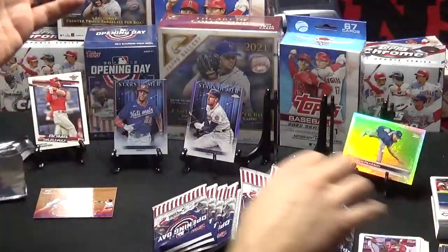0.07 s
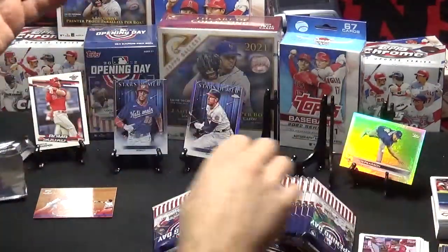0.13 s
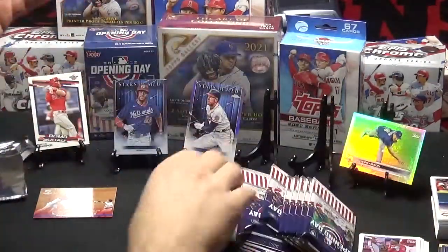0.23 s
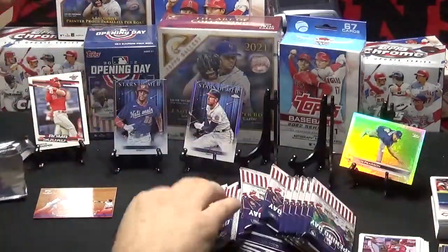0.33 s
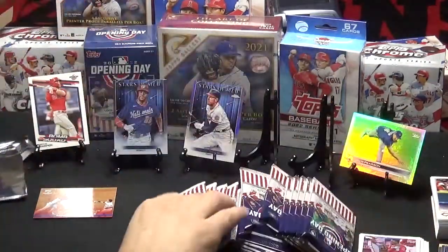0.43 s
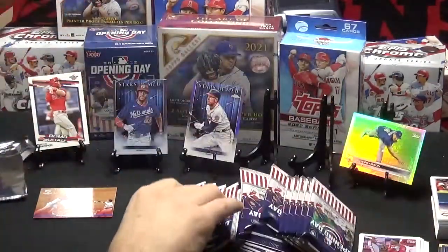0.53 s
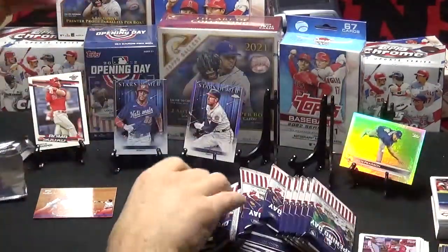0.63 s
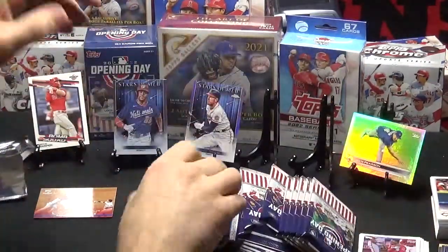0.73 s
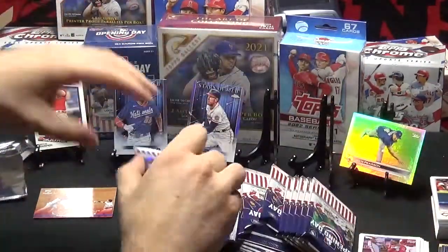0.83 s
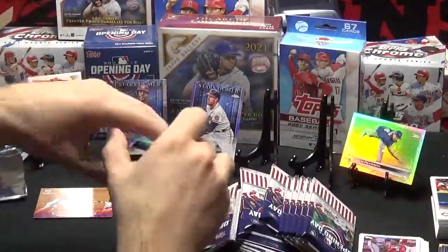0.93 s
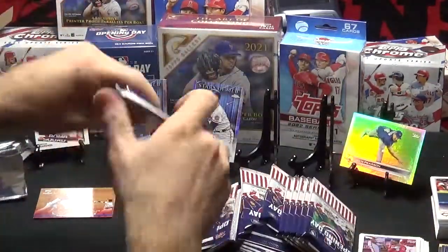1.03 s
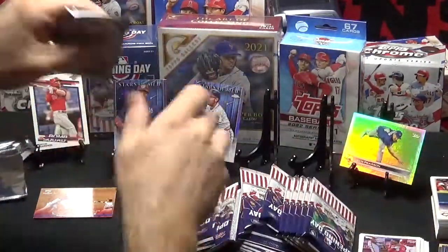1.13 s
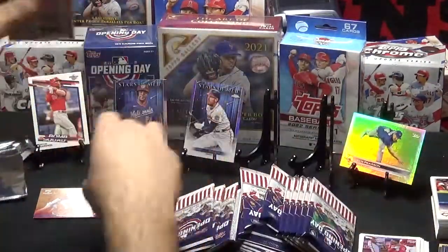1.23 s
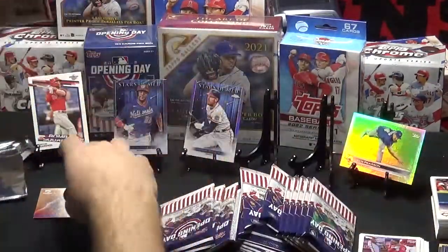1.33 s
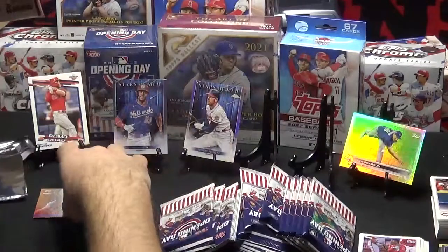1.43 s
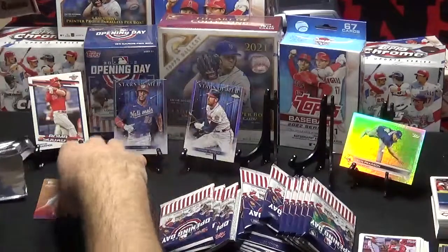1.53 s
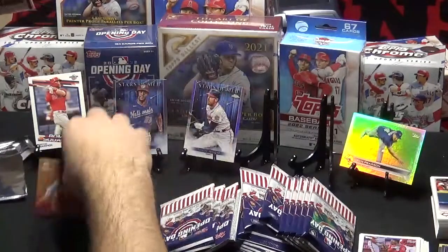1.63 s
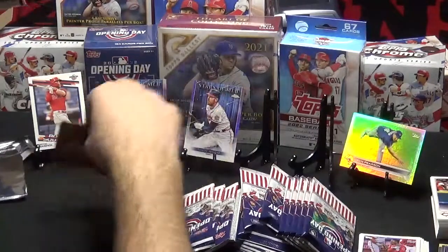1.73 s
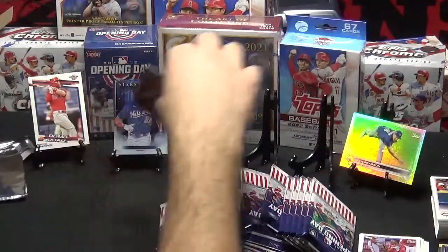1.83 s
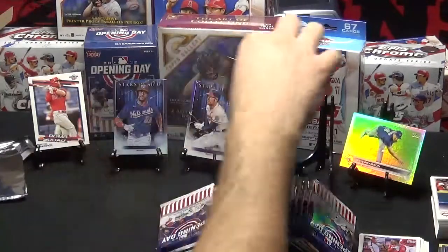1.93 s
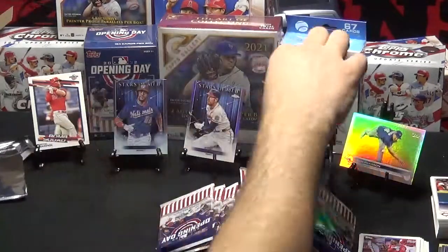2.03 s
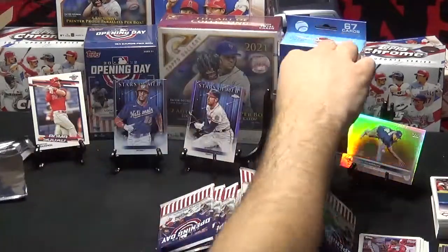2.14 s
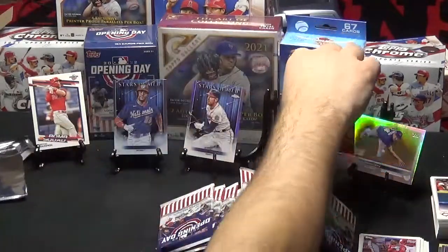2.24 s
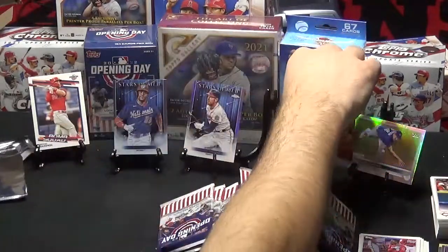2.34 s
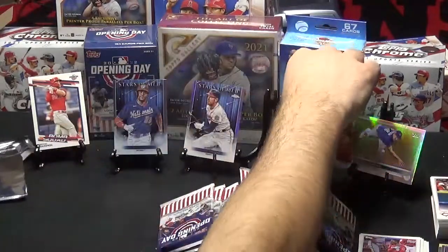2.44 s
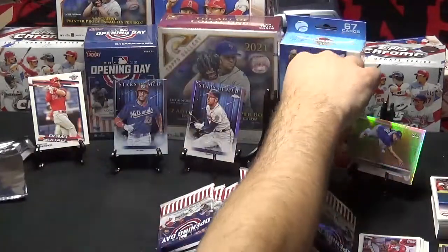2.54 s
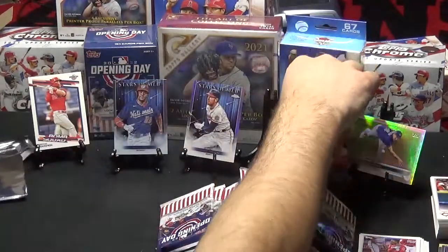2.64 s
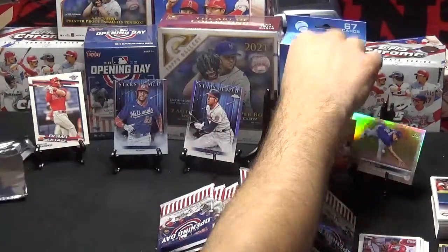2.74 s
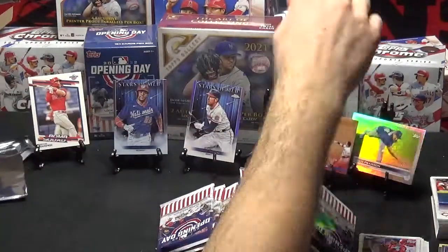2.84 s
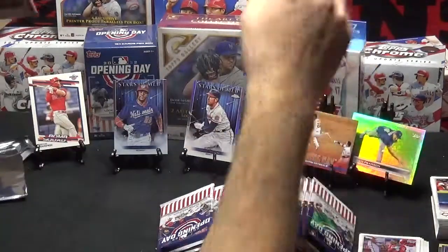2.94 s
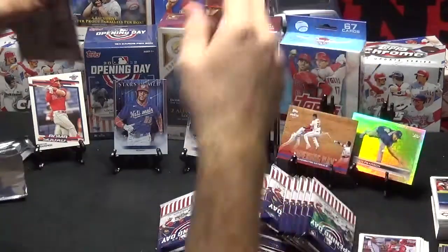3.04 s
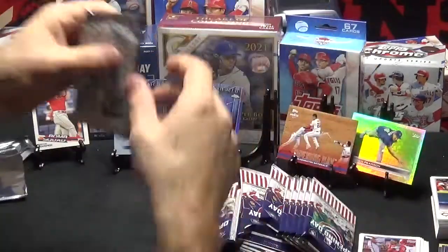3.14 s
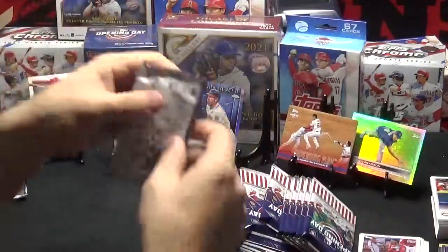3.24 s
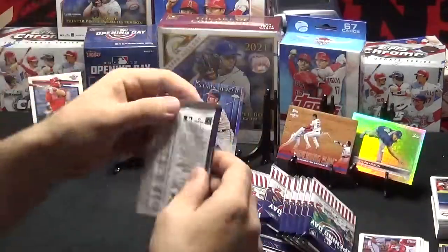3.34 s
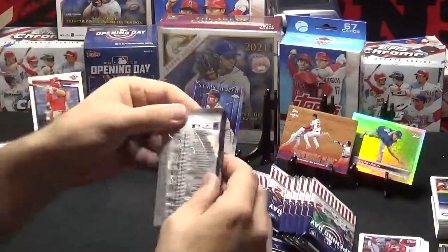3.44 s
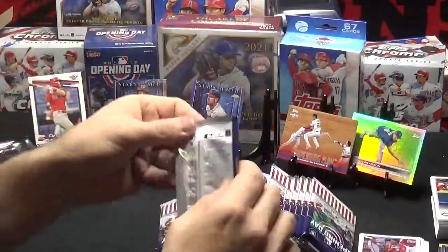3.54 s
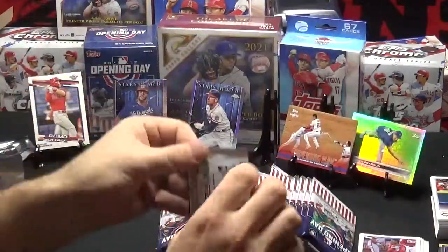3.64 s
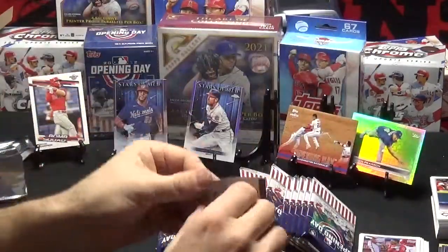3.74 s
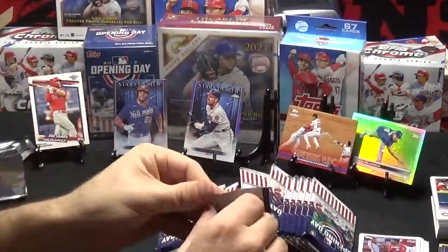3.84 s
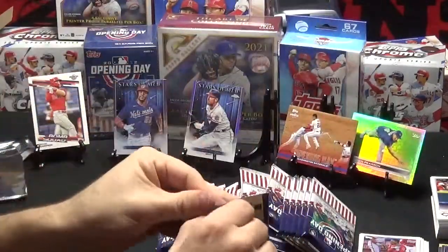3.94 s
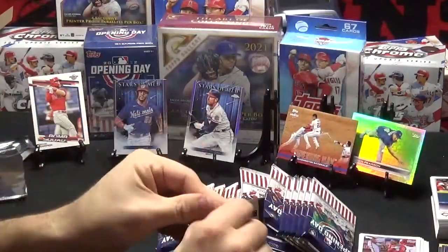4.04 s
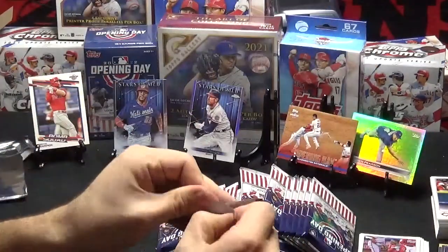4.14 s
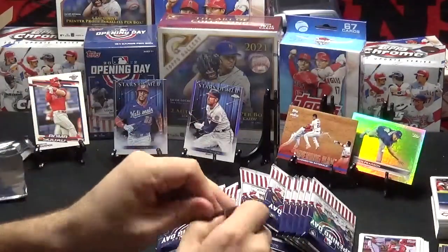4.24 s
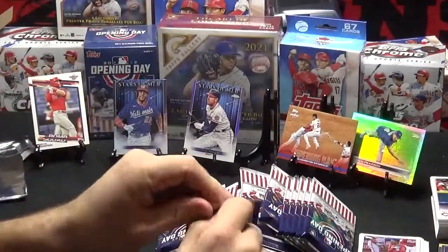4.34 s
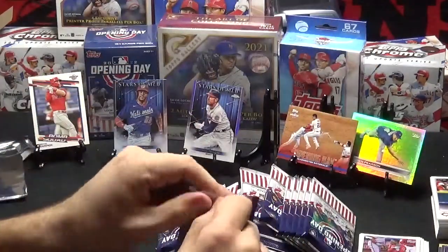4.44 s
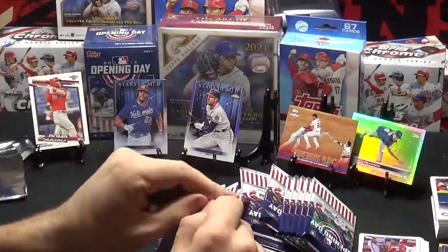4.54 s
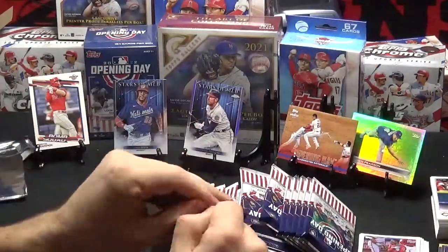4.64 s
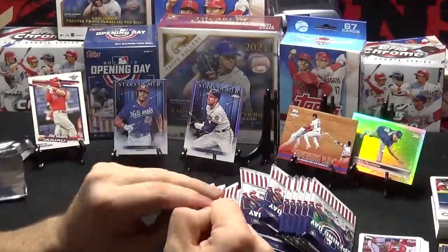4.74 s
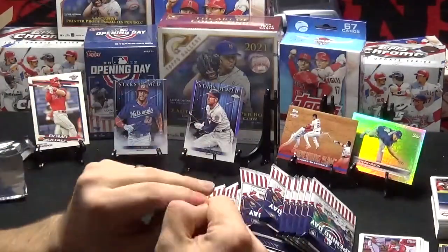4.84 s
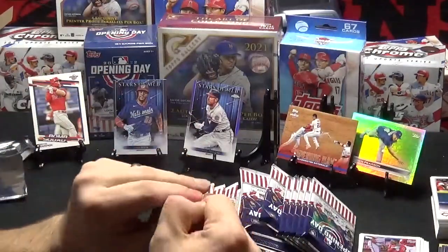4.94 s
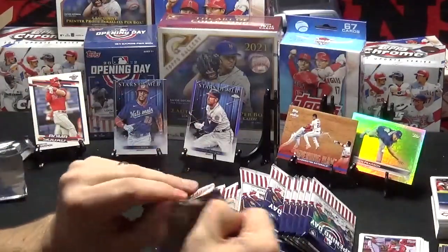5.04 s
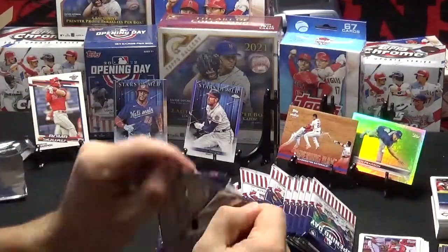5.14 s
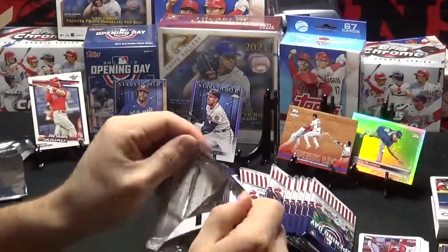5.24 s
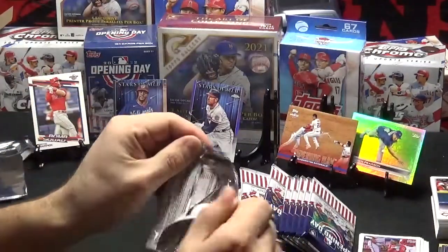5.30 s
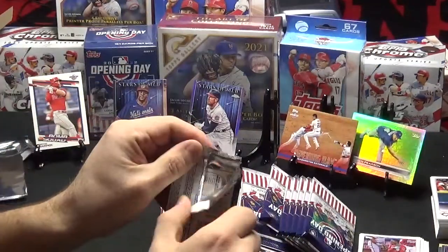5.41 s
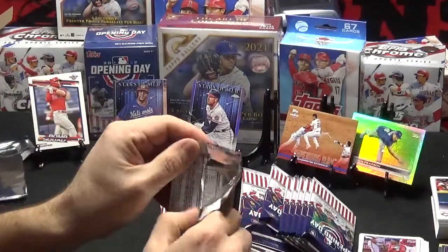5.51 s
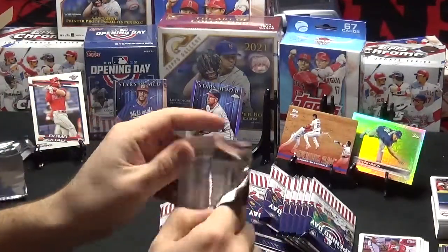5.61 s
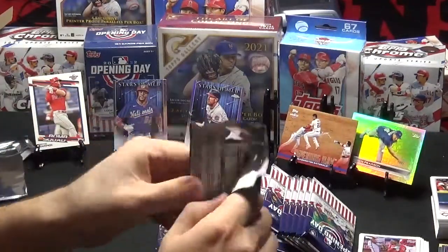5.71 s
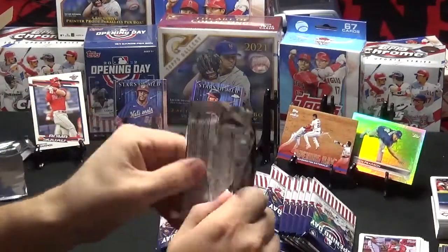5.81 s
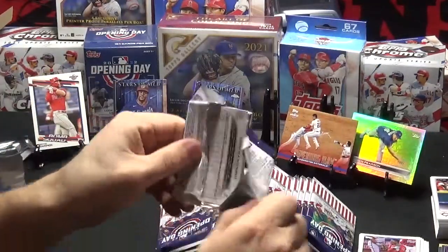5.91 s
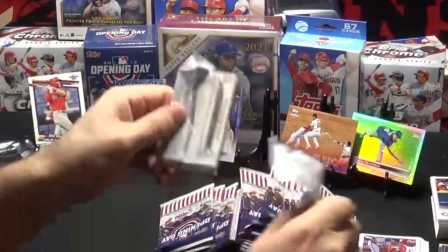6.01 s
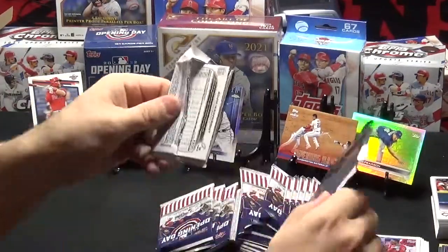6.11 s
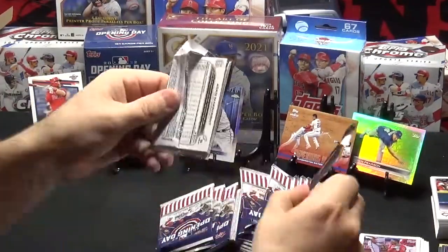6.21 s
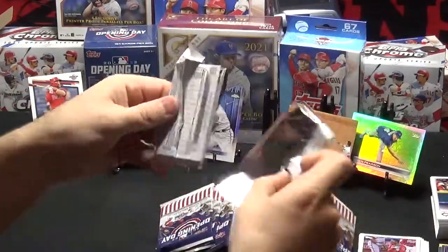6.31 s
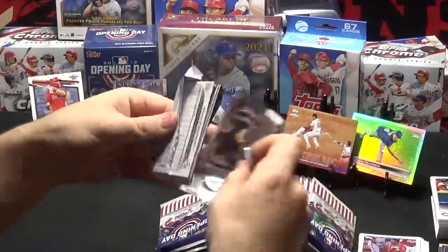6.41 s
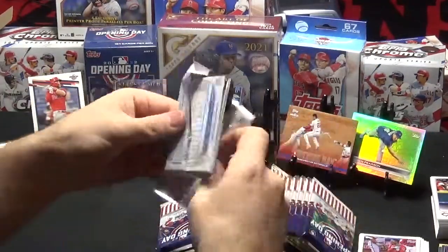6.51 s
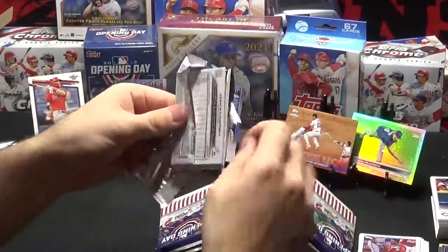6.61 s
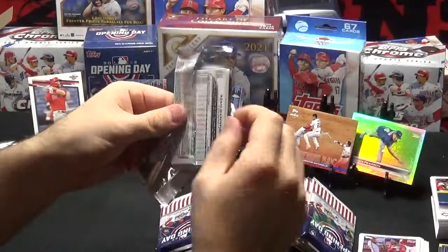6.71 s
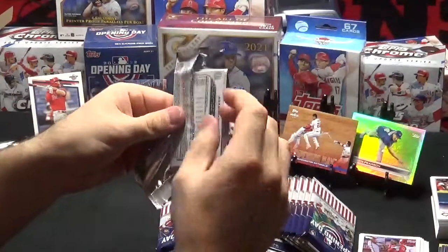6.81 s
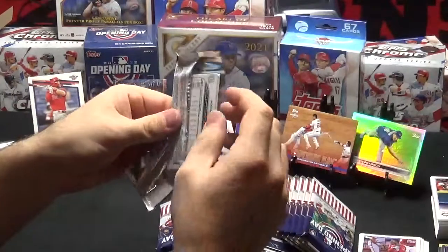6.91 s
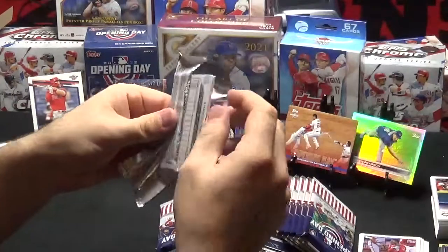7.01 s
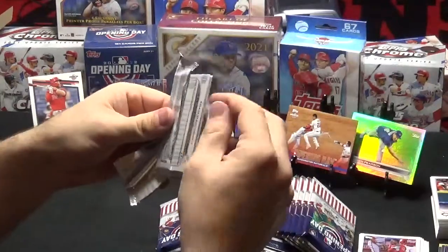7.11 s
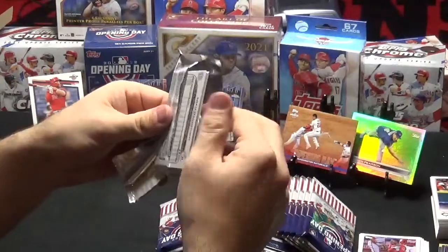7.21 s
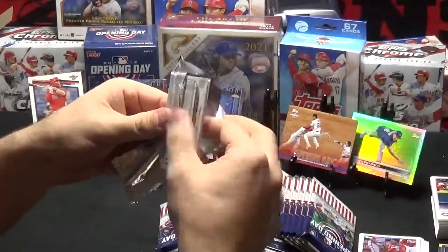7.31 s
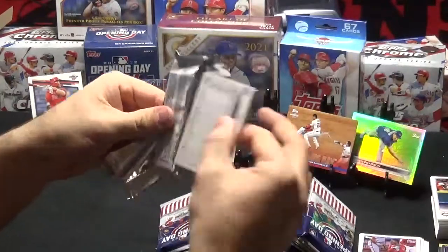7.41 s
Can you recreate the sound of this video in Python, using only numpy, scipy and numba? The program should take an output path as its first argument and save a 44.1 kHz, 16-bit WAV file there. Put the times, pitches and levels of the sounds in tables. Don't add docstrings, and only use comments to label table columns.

```python
import sys
import numpy as np
from scipy import signal
from scipy.fft import rfft, irfft
from scipy.io import wavfile
from scipy.ndimage import uniform_filter1d
from numba import njit

SR = 44100
rng = np.random.default_rng(int(sys.argv[2]) if len(sys.argv) > 2 else 0)


def invert_db(level):
    return 10 ** (np.asarray(level, dtype=float) / 20)


def generate_wav(sig):
    pcm = np.round(np.clip(np.atleast_2d(sig).T, -1, 1) * 32767).astype(np.int16)
    wavfile.write(sys.argv[1], SR, pcm)


N = 328986


def column(table, t):
    s, *rest = np.transpose(table)
    return [np.interp(t, s, c) for c in rest]


def shape(table, hz):
    f, v = np.transpose(table)
    return np.interp(np.log(np.maximum(hz, 1)), np.log(f), v)


def walk(rate):
    hold = int(SR / rate)
    levels = np.repeat(rng.standard_normal(N // hold + 1), hold)
    return 1.3 * uniform_filter1d(uniform_filter1d(levels, hold), hold)[:N]


def highpass(x, hz, order=3):
    return signal.sosfilt(signal.butter(order, hz, "high", fs=SR, output="sos"), x)


def room(air_db=-7.5):
    # f/Hz, level/dB, wander/dB
    hum_lines = [(29.8, -15, 1.5), (38.6, -30, -10), (87, -17.5, 4), (89.3, -28, 4.5), (119.7, 0.5, 0)]
    # t/s, blade tone minus hum/dB
    blade_load = [(0, -4.5), (.25, -11), (.48, -5), (.91, -11), (2.32, -8), (2.49, -14), (2.76, -6.5),
                  (3.6, -13), (4.24, -7.5), (5.1, -11), (5.67, -7), (5.85, -14), (6.15, -8), (7.46, -7)]
    # f/Hz, density/dB per Hz
    air_spectrum = [(20, -12.5), (55, -17), (95, -3.5), (170, -8.5), (300, -15), (400, -16.5), (800, -20),
                    (2300, -22.5), (6000, -28.5), (11000, -31)]
    # f/Hz, likeness/0-1
    likeness = [(20, 1), (200, 0.83), (400, 0.37), (1200, .0), (2600, 0.06), (6000, 0.7), (11000, .75)]
    # t/s, level/dB, width/s
    ducks = [
        (5.07, -4.5, .1),
        (5.92, -7, .1),
        (7.46, -2.5, .2),
    ]
    blade_hz = 202.4
    t = np.arange(N) / SR
    gain_db = np.minimum(-51 + .17 * t ** 2, -46.5)
    for s, db, width in ducks:
        gain_db = gain_db + db * np.exp(-((t - s) / width) ** 2)

    lines = np.zeros(N)
    for hz, db, wander_db in hum_lines:
        level = invert_db(db + wander_db * walk(4))
        lines += level * np.sin(2 * np.pi * hz * t + 0.31 * wander_db * walk(3.4))
    flutter_db, drift = 2.2 * walk(9), 1.2 * walk(3)
    blade_level = invert_db(column(blade_load, t)[0] + flutter_db)
    lines += blade_level * np.sin(2 * np.pi * blade_hz * t + drift)

    hz = np.fft.rfftfreq(N, 1 / SR)
    alike = np.clip(shape(likeness, hz), 0, 1)
    noise = rfft(rng.standard_normal((2, N))) * invert_db(shape(air_spectrum, hz))
    mid, side = noise * np.sqrt([1 + alike, 1 - alike])
    air = irfft(np.array([mid + side, mid - side]), N)
    air *= invert_db(air_db) / air.std()
    balance = invert_db(np.array([[.1], [-.1]]))
    return (np.sqrt(2) * lines * balance + air) * invert_db(gain_db)


def lens(width_s=0.0025, lower_hz=2583.0):
    # t/s, upper level/dB, lower level/dB, accent on every other step/dB
    spells = [
        (0, -56.5, -67, .6),
        (.85, -67, -63, .6),
        (1.15, -64, -59, .6),
        (1.8, -66, -57, 5),
        (2.49, -66, -67, .6),
        (3.0, -61, -67, .6),
        (5.5, -57, -62, .6),
    ]
    steps_per_s, upper_hz = 30, 3400
    s = np.arange(int(steps_per_s * N / SR)) / steps_per_s
    by_column = np.transpose(spells)
    spell = np.searchsorted(by_column[0], s, "right").clip(1) - 1
    _, upper_db, lower_db, accent_db = by_column[:, spell]
    upper_db = upper_db - accent_db * (-1.) ** np.arange(len(s))
    g = rng.standard_normal((len(s), 4)).T
    t, out = np.arange(-600, 600) / SR, np.zeros(N + SR)
    for k in range(len(s)):
        detune = 1 + .006 * g[3, k]
        upper = (.0143, upper_hz * detune, upper_db[k] + 1.6 * g[0, k], width_s)
        lower = (.018, lower_hz * detune, lower_db[k] + 1.2 * g[1, k], 1.57 * width_s)
        for delay_s, hz, db, width in (upper, lower):
            i = int((s[k] + delay_s) * SR)
            swell = invert_db(db) * np.exp(-(t / width) ** 2)
            out[i:i + len(t)] += swell * np.sin(2 * np.pi * hz * t + .5 * g[2, k])
    return out[600:N + 600]


@njit
def ring(s, hz, cycles, left, right):
    out = np.zeros((2, N))
    for g in range(len(s)):
        p = np.exp((2j * np.pi - 1 / cycles[g]) * hz[g] / SR)
        z = 1. + 0j
        start = int(s[g] * SR)
        for i in range(start, min(N, start + int(6 * cycles[g] * SR / hz[g]))):
            z *= p
            out[0, i] += left[g] * z.imag
            out[1, i] += right[g] * z.imag
    return out


def grains(s, hz, cycles, size, pan_db):
    left, right = size * invert_db(pan_db / 2), size * invert_db(-pan_db / 2)
    hz = np.clip(hz, 150, SR / 3)
    return ring(*[np.ravel(v + 0. * s) for v in (s, hz, cycles, left, right)])


def moves(s):
    # peak t/s, crackle level/dB, swell/s per 20 dB, fade/s per 20 dB,
    # big folds minus crackle/dB
    card_moves = [
        (.41, -49, .008, .2, -4),
        (.48, -48, .1, .12, -8),
        (.54, -50, .1, .1, -10),
        (.61, -45, .12, .05, -13),
        (.85, -57, .4, .3, -17),
        (1.03, -43, .04, .12, 2),
        (1.7, -60, .08, .05, 19),
        (2.59, -66, .03, .12, 14),
        (2.795, -62, .008, .15, 17),
        (3.12, -49, .1, .3, -12),
    ]
    grip_moves = [(3.224, -43, .22, .35, -6), (3.383, -37, .021, .19, -7), (3.626, -35, .07, .09, -19),
                  (3.743, -24.5, .021, .06, -19), (3.85, -42, .1, .2, -23), (3.907, -35, .07, .09, -30),
                  (3.995, -26, .03, .15, -21), (4.094, -20, .07, .17, -28), (4.2, -29, .1, .12, -18),
                  (4.322, -21.5, .015, .16, -26), (4.47, -32, .1, .13, -12), (4.649, -43, .2, .12, -18),
                  (4.78, -31, .05, .08, -25), (4.83, -23.5, .03, .2, -22), (4.95, -26, .25, .03, -19)]
    tear_moves = [
        (5.01, -15.5, .005, .15, -20),
        (5.032, -11.5, .03, .25, -22),
        (5.2, -26, .2, .05, -3),
        (5.31, -38, .021, .06, 2.5),
        (5.374, -27, .03, .085, -11),
        (5.53, -31, .011, .19, -9),
        (5.82, -18, .065, .17, -17),
        (5.91, -15.5, .12, .12, -2),
        (6.005, -16, .2, .07, -7),
    ]
    peel_moves = [(6.252, -27, .003, .06, -14), (6.29, -24, .03, .11, -12), (6.42, -42, .1, .07, -7),
                  (6.52, -23.5, .035, .13, -6), (6.6, -33, .1, .035, -13), (6.736, -24.5, .011, .035, -10),
                  (6.848, -36, .04, .055, -23), (6.943, -29, .021, .08, -12), (7.074, -34, .004, .15, -8),
                  (7.138, -27, .03, .05, -13), (7.25, -38, .1, .12, -13), (7.39, -31, .09, .3, -8)]
    rows = np.vstack([card_moves, grip_moves, tear_moves, peel_moves])
    at_s, db, swell_s, fade_s, big_db = rows.T[:, :, None]
    t = np.arange(0, N, 44) / SR

    def level(top_db, fade):
        fall_db = 20 * np.maximum((at_s - t) / swell_s, (t - at_s) / fade)
        return 10 * np.log10(np.sum(invert_db(top_db - fall_db) ** 2, axis=0) + 1e-12)

    return np.interp(s, t, level(db, fade_s)), np.interp(s, t, level(db + big_db, 1.3 * fade_s))


def crackle(per_s=11000, tail_db=2.5, patchy_db=2.0, cycles=1.06, level_db=-11.4, knee_hz=1790.0):
    # f/Hz, density/dB per Hz
    sheet_colour = [(180, -40), (300, 6), (591, -12.5), (719, -5), (915, -11.5), (1530, -7.5), (2230, -3),
                    (9180, 2.5), (11000, 1.5), (14300, -34), (22000, -120)]
    # t/s, top end level/dB
    tautness = [(3.8, -6), (3.92, 8), (4.1, -1.5), (4.79, -3), (4.92, 4), (5.03, 5), (5.09, -6),
                (5.33, -5.5), (5.55, 1.5), (5.72, -6), (5.91, 2.5), (6.1, -10), (6.7, -7), (6.96, .6),
                (7.09, -7.5), (7.15, 3), (7.3, -8), (7.46, -2)]
    count = int(per_s * N / SR)
    u, g = rng.random((count, 3)).T, rng.standard_normal((count, 2)).T
    s, hz = u[0] * N / SR, 300 * (11500 / 300) ** np.sqrt(u[1])
    db, big_db = moves(s)
    taut_db = 0.97 * column(tautness, s)[0] * np.clip(np.log2(hz / 3500), -.5, 1.5)
    colour_db = shape(sheet_colour, hz) + 20 * np.log10(hz / 4000) + taut_db
    clump_db = patchy_db * walk(120)[(u[0] * N).astype(int)]
    rare_db = -tail_db * np.log(u[2] + .01)
    size = np.sign(g[0]) * invert_db(db + level_db + colour_db + clump_db + rare_db)
    big = hz < knee_hz
    fine = grains(s, hz, cycles, size * ~big, 3.1 * g[1])
    soft_size = (size * invert_db(big_db - db + 11.5))[big]
    soft = grains(s[big], hz[big], 1.2, soft_size, 4.9 * g[1, big])
    return highpass(fine, 1080.0) + soft


def small_snaps():
    per_s = 110
    u = rng.random((int(per_s * N / SR), 4)).T
    s = u[0] * N / SR
    db = moves(s)[0] - 2 - 2.5 * np.log(u[1] + .03)
    return np.transpose([s, db, 2900 * 2.8 ** u[2], -4 - 18 * u[3]])


def snaps(count=16, level_db=-15.0, thud_db=-4.0):
    # t/s, peak level/dB, centre
    # # f/Hz, top end minus peak/dB
    single_snaps = [(.413, -43, 1630, -8), (.4868, -42, 1680, 0.5), (.58, -39, 3300, -10),
                    (1.0071, -32, 3810, -16), (1.0108, -18.5, 5100, -10), (1.0225, -17, 3830, -3),
                    (1.038, -26, 3330, -21), (1.6679, -33, 2600, -13), (1.6944, -33, 3200, -12),
                    (2.58, -43, 4300, -22), (2.593, -43, 4200, -22), (1.713, -40, 1800, -12),
                    (1.026, -22, 3500, -10), (1.0135, -23, 3900, -10), (2.6559, -40, 1470, -23),
                    (2.7926, -34, 1330, -16),
                    (3.212, -28.5, 7360, -8), (3.219, -26.5, 4840, -4), (3.3762, -16.5, 5470, -9),
                  (3.41, -17, 7050, -14), (3.464, -21, 4350, -14), (3.4676, -24, 3220, -7),
                  (3.595, -31, 3030, -5), (3.6145, -14.5, 5900, -9), (3.623, -20, 6660, -10),
                  (3.637, -18, 6000, -8), (3.6534, -14.5, 6400, -9), (3.6709, -13, 5000, -14),
                  (3.7318, -24, 3000, -10), (3.7352, -15, 4300, -11), (3.7466, -12, 6000, -4),
                  (3.7629, -11.5, 4540, -25), (3.8256, -22, 6370, -10), (3.9017, -30, 4650, 4),
                  (3.9778, -19, 4650, 7), (3.9866, -17, 6500, 2), (4.0059, -10, 6600, -6),
                  (4.0636, -15, 4520, -14), (4.082, -12, 6700, -3), (4.0913, -6, 6240, -9),
                  (4.1042, -9, 5300, -3),
                    (4.1976, -14, 7700, -2.5), (4.235, -18, 3930, -12), (4.248, -21, 7300, -3),
                   (4.313, -16, 5500, -9), (4.3246, -8, 4600, -6.5), (4.3656, -20, 4480, -7),
                   (4.4013, -11, 4540, -12), (4.458, -21, 7490, 3), (4.4705, -12.5, 4000, -5),
                   (4.595, -15.5, 5900, -13.5), (4.6382, -14.5, 6100, -13), (4.6595, -18, 5050, -13),
                   (4.683, -23.5, 6290, -3), (4.7162, -22, 2270, -17), (4.7507, -23, 5000, -2),
                   (4.7618, -15, 4600, -10), (4.7771, -9, 2200, -13), (4.8251, -7.5, 4540, -9),
                   (4.903, -16, 5600, -12),
                    (5.0057, -18, 5730, 6), (5.078, -4, 4260, -25), (5.0983, -5, 7500, -16),
                  (5.1128, -7, 1770, -33), (5.154, -11, 7490, 1.5), (5.172, -12, 7060, -10),
                  (5.2125, -17, 4700, -2), (5.314, -21.5, 3980, -15), (5.3621, -11, 3830, -11),
                  (5.379, -15, 4400, -14), (5.4242, -22, 4900, -4), (5.5793, -14.5, 5460, -8),
                  (5.6038, -16, 4940, -6), (5.6327, -18, 4400, -18), (5.7097, -16, 3620, -32),
                  (5.731, -14, 7200, -11), (5.7392, -18.5, 2800, -6), (5.7925, -7, 5900, -8),
                  (5.8116, -6.5, 6200, -15), (5.832, -1.5, 5400, -17), (5.8382, -9, 5000, -5),
                  (5.8573, -4.5, 6460, -22), (5.8822, -5.5, 5500, -12), (5.9238, -7, 4130, -13),
                  (5.9473, -9.5, 2800, -17), (6.0056, -4, 7940, -9.5),
                    (6.2918, -21, 6600, -6), (6.2962, -15, 6360, -28), (6.3315, -18.5, 3130, -17),
                  (6.5186, -12, 6000, -1.5), (6.526, -9.5, 6660, -13), (6.5414, -15, 2800, -6),
                  (6.5663, -12, 5400, -2), (6.6035, -14, 4000, -12), (6.737, -21, 4400, -7.5),
                  (6.838, -26, 3350, -2), (6.932, -24, 5800, .6), (6.9411, -24, 6420, -1),
                  (6.953, -15.5, 4940, -19), (7.0702, -20, 4600, -13), (7.095, -26, 2600, -10),
                  (7.1391, -14, 5560, -5), (7.247, -29, 3300, -9), (7.2952, -22, 3570, -15),
                  (7.349, -30, 4090, -6), (7.3834, -21, 3830, -18), (7.4179, -8, 5500, -13),
                  (7.4564, -12, 6900, -9)]
    more_early_snaps = [(0.9728, -40.0, 3230, -12.6), (1.6904, -40.0, 1680, -23.6), (1.7995, -43.1, 2330, -30.9),
                        (3.1741, -35.4, 2200, -18.0), (3.1927, -37.8, 5210, -9.7), (3.2083, -38.4, 4520, -17.2),
                        (3.2259, -28.8, 6200, -2.5), (3.2738, -37.3, 4310, -10.0), (3.3407, -34.9, 2800, -9.6),
                        (3.4572, -29.2, 1640, -15.9), (3.5382, -39.2, 4010, -15.5), (3.666, -22.1, 4390, -19.8),
                        (3.8473, -21.5, 7970, -12.8), (3.852, -33.2, 7970, -4.6), (3.87, -26.1, 5470, -5.3),
                        (3.9049, -23.9, 7970, 2.4), (3.917, -18.5, 4390, -13.7), (3.9469, -23.9, 7060, -10.4),
                        (3.9608, -28.8, 7970, -5.9), (4.0474, -19.3, 4870, -9.5), (4.0522, -18.5, 6980, -15.5),
                        (4.1944, -21.6, 2970, -14.0), (4.2074, -22.1, 4050, -8.1), (4.2186, -24.9, 3880, -11.0),
                        (4.2567, -18.5, 6980, -7.5), (4.2835, -28.7, 6420, -15.7), (4.3606, -22.3, 4440, -4.5),
                        (4.3811, -15.8, 4780, -15.9), (4.4395, -24.4, 5600, -8.7), (4.4626, -17.9, 7970, -5.7),
                        (4.5448, -34.1, 5510, -8.7), (4.5514, -32.2, 5510, -7.3), (4.5708, -37.4, 7580, -11.3),
                        (4.5753, -40.9, 4440, -4.5), (4.5792, -30.1, 4650, -10.8), (4.789, -16.1, 2200, -26.2),
                        (4.8351, -10.1, 2070, -17.4), (4.969, -18.8, 7060, -9.3)]
    more_late_snaps = [(5.1605, -9.4, 6330, -7.8), (5.1943, -17.3, 7970, -4.5), (5.221, -12.1, 1590, -12.1),
                       (5.2489, -18.2, 1550, -7.0), (5.3192, -25.2, 3880, -5.3), (5.4, -23.9, 5380, -0.6),
                       (5.432, -28.6, 5430, -9.3), (5.5217, -32.0, 7320, -7.4), (5.5602, -26.5, 4050, -10.6),
                       (5.6272, -28.0, 4220, -21.6), (5.7246, -27.5, 7580, -12.5), (5.7473, -25.1, 3400, -7.1),
                       (5.7617, -26.6, 4090, -12.2), (5.7762, -17.4, 4390, -9.4), (5.7889, -20.2, 4570, -9.2),
                       (5.7985, -10.1, 4050, -21.5), (5.8163, -9.6, 7670, -9.3), (5.906, -11.0, 5600, -7.8),
                       (5.9675, -8.8, 4610, -9.2), (5.9987, -10.6, 4480, -16.2), (6.2873, -21.5, 6720, -13.1),
                       (6.3489, -27.3, 3140, -24.0), (6.4112, -34.4, 4050, -26.0), (6.4913, -32.4, 4520, -18.8),
                       (6.7138, -43.6, 3320, -9.5), (6.721, -34.7, 5990, -11.3), (6.7415, -20.6, 5000, -18.3),
                       (6.7476, -27.4, 4480, -12.7), (6.913, -39.4, 6200, -10.3), (6.996, -27.5, 5430, -17.3),
                       (7.0783, -31.5, 4480, -14.5), (7.1352, -18.1, 7060, -21.3), (7.3144, -31.9, 4610, -18.0),
                       (7.3354, -33.2, 2760, -25.1), (7.3574, -33.5, 2580, -10.2), (7.373, -24.1, 5810, -17.6)]
    rows = np.vstack([single_snaps, small_snaps(),
                      more_early_snaps, more_late_snaps])
    s, db, hz, top_db = rows.T[:, :, None]
    u = rng.random((len(s), 3, count)).transpose(1, 0, 2)
    g = rng.standard_normal((len(s), 3))
    pan_db, first_sign = .6 * g[:, :1], np.sign(g[:, 1:2])

    after_s = .0009
    later = np.arange(count) % 2
    lag = np.where(later, after_s * (.3 - np.log(u[0] + .02)), .00015 * u[0])
    spray_hz = 2400 + 9300 * (np.arange(count) + u[1]) / count
    tilt_db = (top_db + 15.5) * np.clip((spray_hz - 5000) / 3000, 0, 1)
    tilt_db = tilt_db + 8.0 * np.minimum(np.log2(1.35 * spray_hz / hz), 0)
    sign = np.where(later, np.sign(u[2] - .5), first_sign)
    spray_size = invert_db(db + level_db + tilt_db) * sign
    spray = grains(s + lag, spray_hz, 1.35 * spray_hz / 5000, spray_size, pan_db)

    own = grains(s, hz, np.maximum(2.2, hz / 1500), invert_db(db - 5.5) * first_sign, pan_db)
    echo_db, echo_s = -7, .002
    again_s = s + echo_s * (.4 + u[0, :, 1:2])
    again_hz = hz * (.85 + .3 * u[1, :, 1:2])
    own = own + grains(again_s, again_hz, hz / 1300, invert_db(db - 5.5 + echo_db), -pan_db)

    fine_db, big_db = moves(s)
    low_db = -19 + .65 * np.minimum(big_db - fine_db, -5) + 3 * g[:, 2:]
    thud = grains(s, 600 * 1.81 ** u[2, :, :1], 2.03, invert_db(db + low_db + thud_db), pan_db)
    return highpass(spray, 2400.) + highpass(own, 1200.0) + thud


def knocks(cycles=2.1, gain_db=-1.2):
    # t/s, peak level/dB, f/Hz
    finger_knocks = [(1.012, -41, 412), (1.04, -45, 700), (1.693, -44, 589), (1.706, -46, 600),
                     (3.636, -44, 764), (3.665, -38, 654), (4.381, -36, 1400), (4.776, -40, 1140),
                     (5.361, -36, 549), (5.43, -41, 791), (5.072, -29, 1010), (5.205, -30, 654),
                     (5.246, -30, 762), (5.313, -33, 649), (5.523, -37, 694), (5.601, -36, 554),
                     (5.863, -25, 802), (5.902, -26, 748), (5.812, -33, 1050), (5.882, -25, 767),
                     (5.915, -28, 800), (5.93, -28, 700), (5.997, -27, 700), (6.294, -40, 805),
                     (6.309, -37, 797), (6.509, -33, 1000), (6.519, -27, 1040), (6.565, -29, 851),
                     (6.736, -39, 1000), (6.189, -39, 406), (6.503, -32, 1050), (6.939, -39, 985)]
    s, db, hz = np.transpose(finger_knocks)
    dull = grains(s, hz, cycles, invert_db(db + gain_db), 0.)
    return dull + grains(s, 1.7 * hz, cycles, invert_db(db - 4), 0.)


def walls(x, count=4, t60_s=0.29, near_t60_s=0.089, near=0.73, table_db=-12.5, alike=0.49):
    wet_db = -4
    t = np.arange(SR // 2) / SR
    decay = invert_db(-60 * t / t60_s) + near * invert_db(-60 * t / near_t60_s)
    decay = decay * np.clip(t / 0.006, 0, 1)
    place = np.repeat(rng.integers(count, size=N // 400 + 1), 400)[:N]
    out = x.copy()
    for k in range(count):
        mid, side = rng.standard_normal((2, len(t))) * decay
        tail = np.array([mid + (1 - alike) * side, mid - (1 - alike) * side])
        tail *= invert_db(wet_db) / np.sqrt(np.mean(np.sum(tail ** 2, axis=1)))
        table_s = rng.uniform(.0012, .0024)
        tail[:, int(table_s * SR)] += invert_db(table_db)
        share = uniform_filter1d(1. * (place == k), size=64)
        out = out + signal.fftconvolve(x * share, tail, axes=1)[:, :N]
    return out


def scene():
    handling = crackle() + snaps() + knocks()
    return walls(highpass(handling, 220.0)) + room() + lens()


def low_pass(x):
    return signal.sosfilt(signal.butter(12, 12190, fs=SR, output="sos"), x)


def record(dry):
    top_hz = 11000
    hz = np.fft.rfftfreq(N, 1 / SR)
    cliff_db = -45.0 * np.clip((hz - top_hz) / 250., 0, 1)
    slope_db = -5.7 * np.clip(hz - top_hz, 0, None) / 1000
    rounded = np.tanh(1.67 * dry) / 1.538
    mix = irfft(rfft(rounded) * invert_db(cliff_db + slope_db), N)
    return low_pass(mix)


dry = scene()
out = record(dry)
generate_wav(out)
```